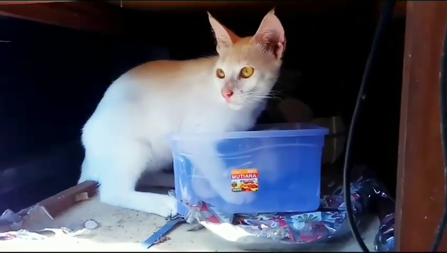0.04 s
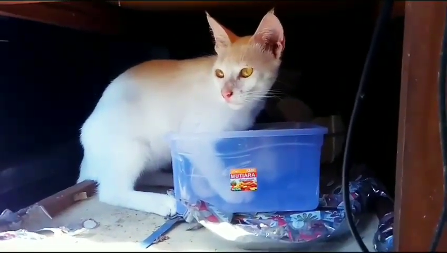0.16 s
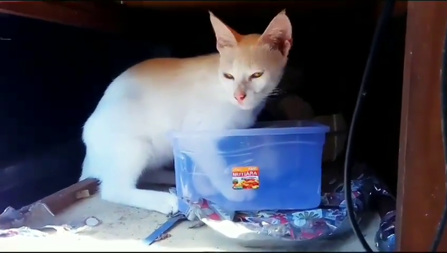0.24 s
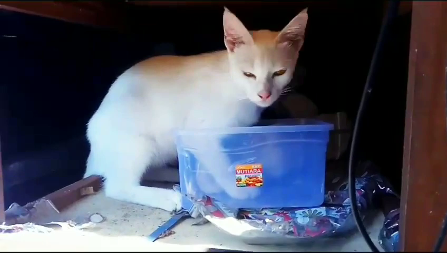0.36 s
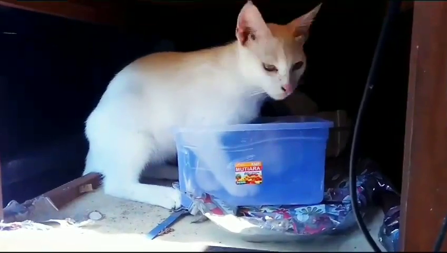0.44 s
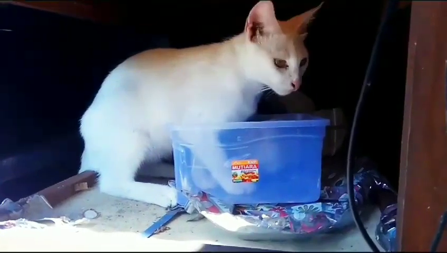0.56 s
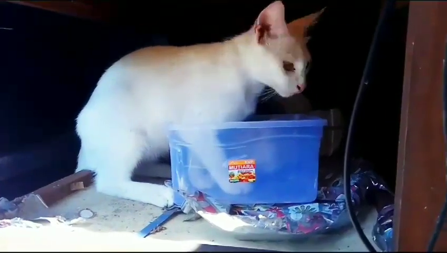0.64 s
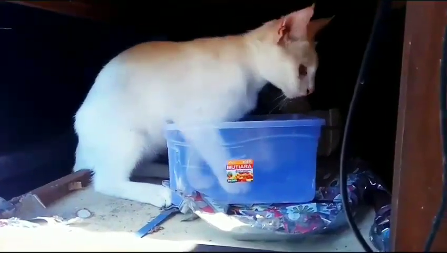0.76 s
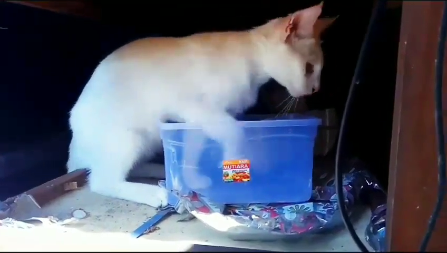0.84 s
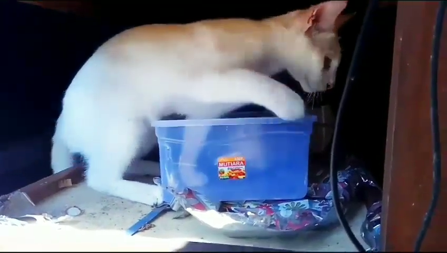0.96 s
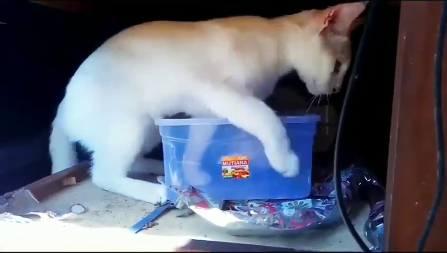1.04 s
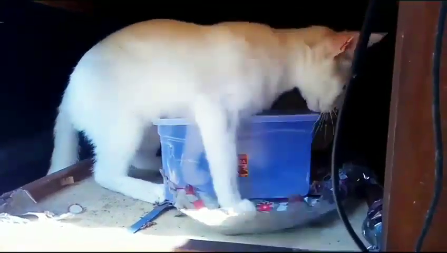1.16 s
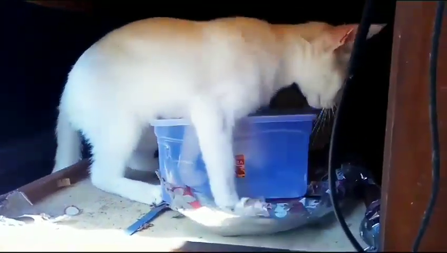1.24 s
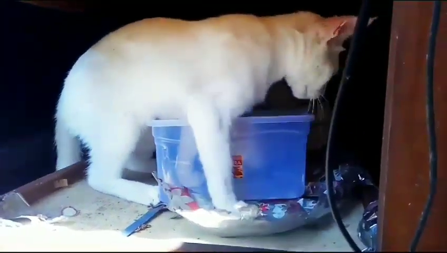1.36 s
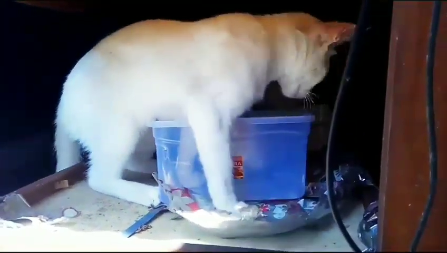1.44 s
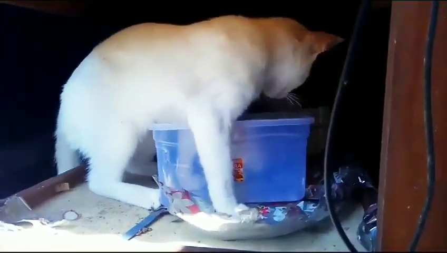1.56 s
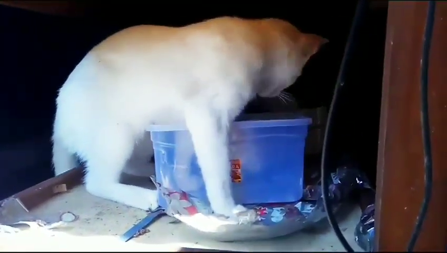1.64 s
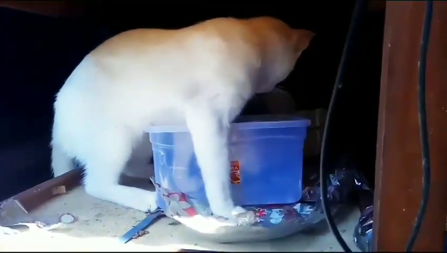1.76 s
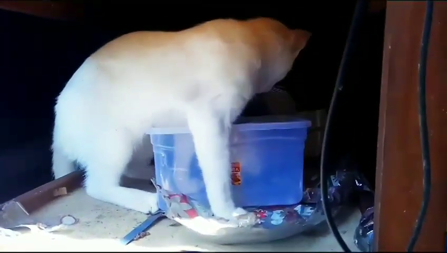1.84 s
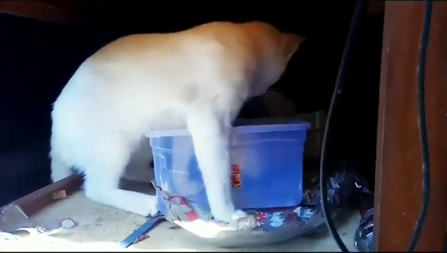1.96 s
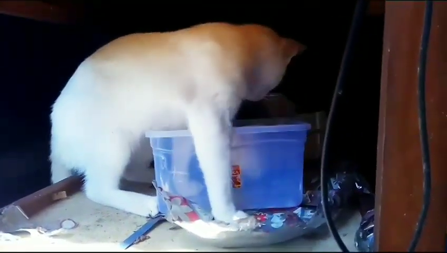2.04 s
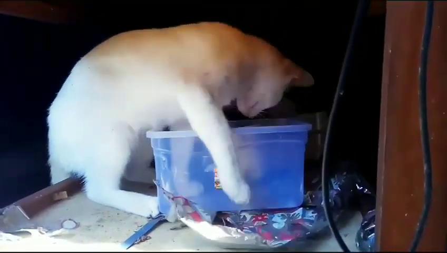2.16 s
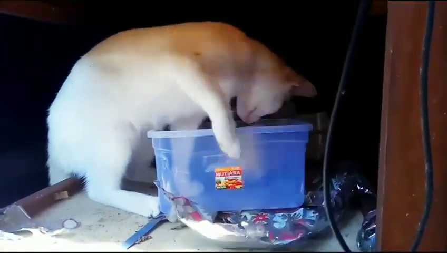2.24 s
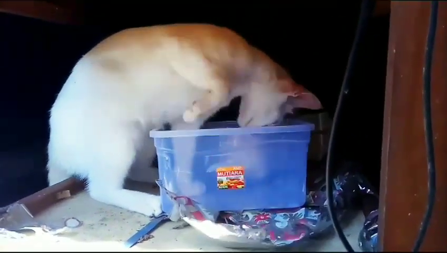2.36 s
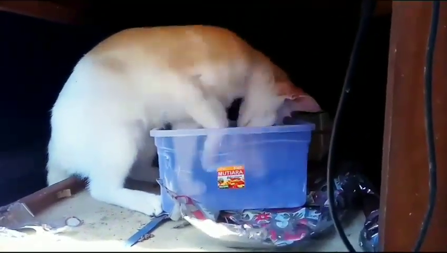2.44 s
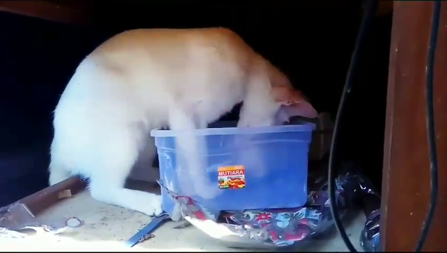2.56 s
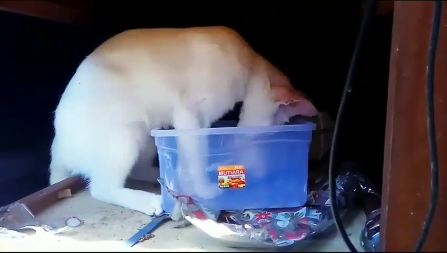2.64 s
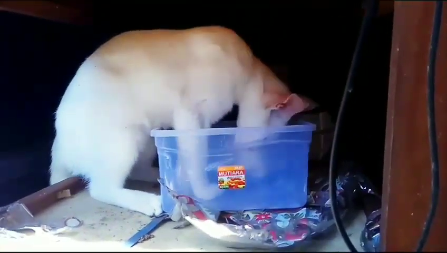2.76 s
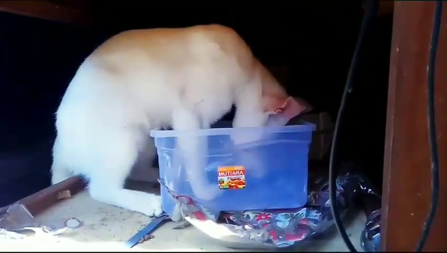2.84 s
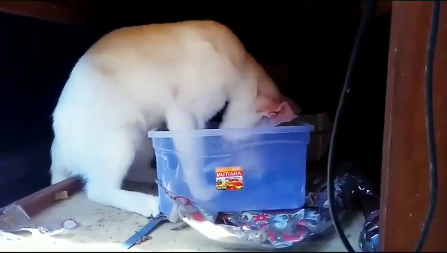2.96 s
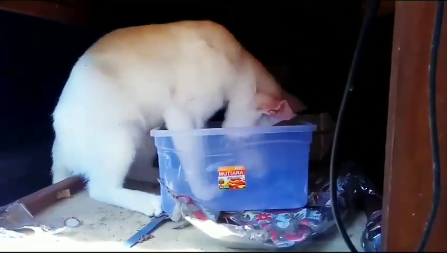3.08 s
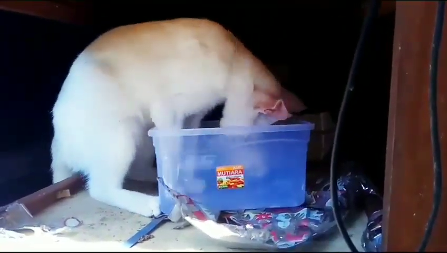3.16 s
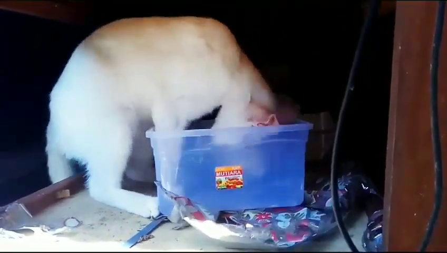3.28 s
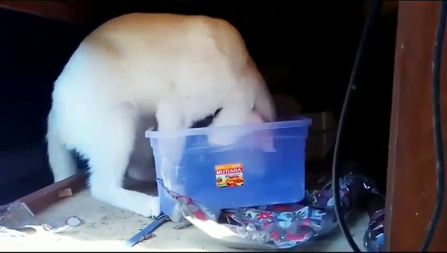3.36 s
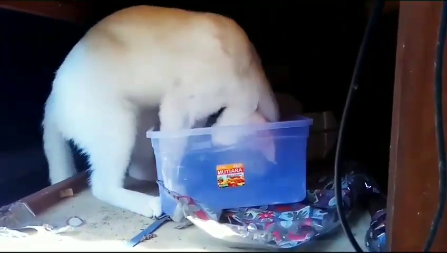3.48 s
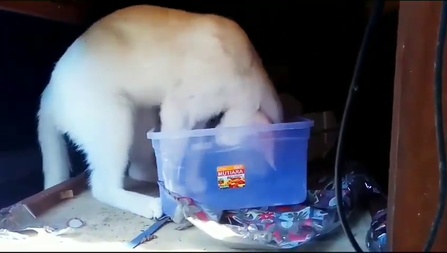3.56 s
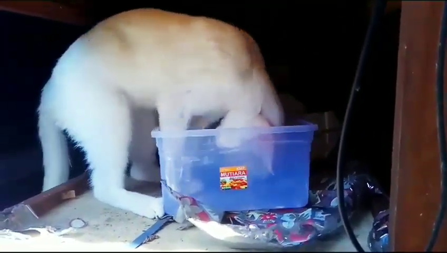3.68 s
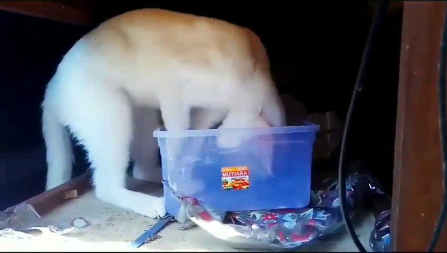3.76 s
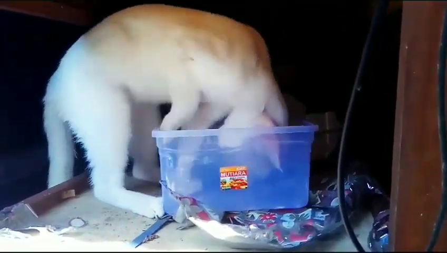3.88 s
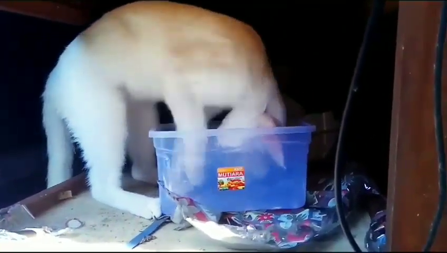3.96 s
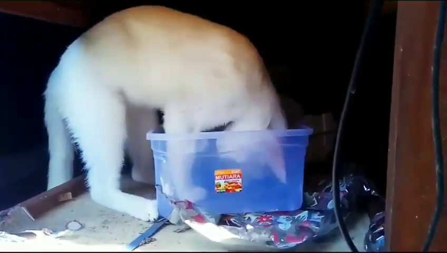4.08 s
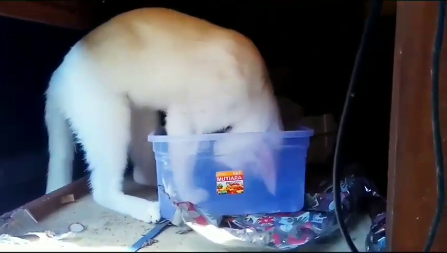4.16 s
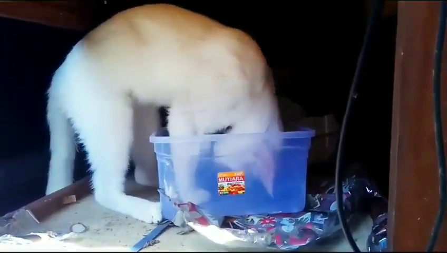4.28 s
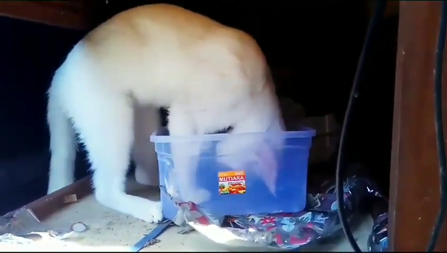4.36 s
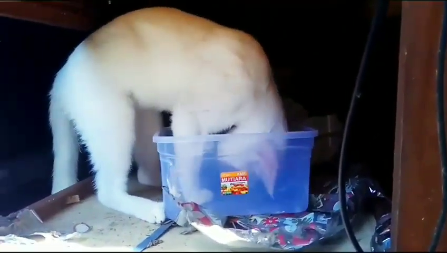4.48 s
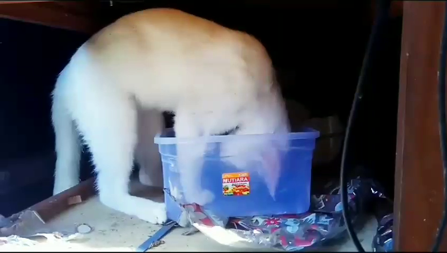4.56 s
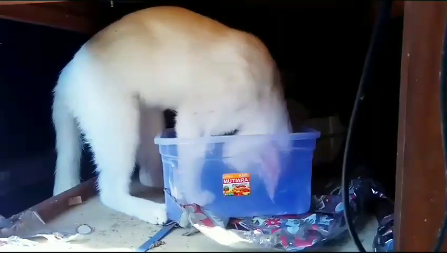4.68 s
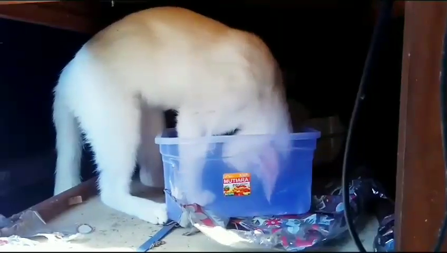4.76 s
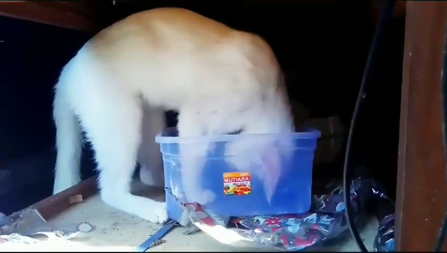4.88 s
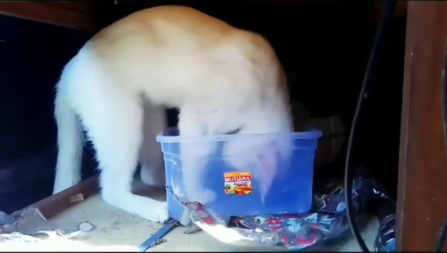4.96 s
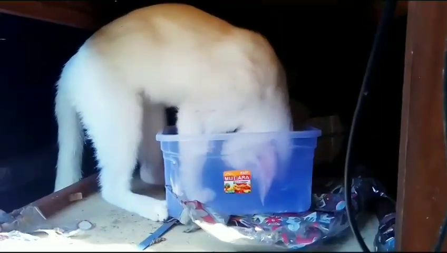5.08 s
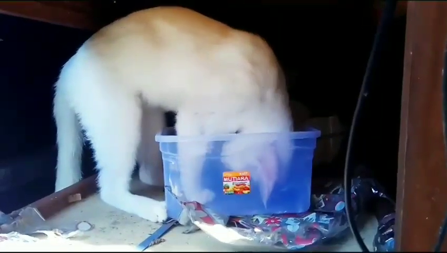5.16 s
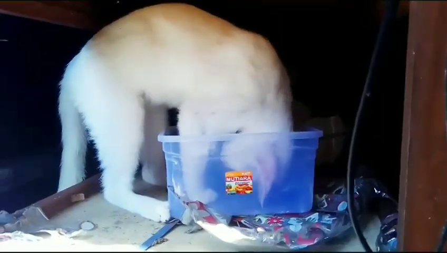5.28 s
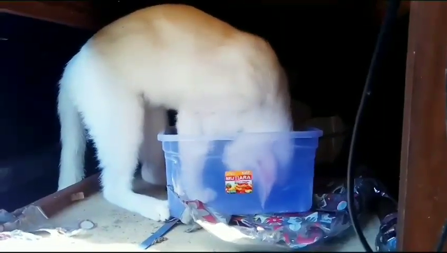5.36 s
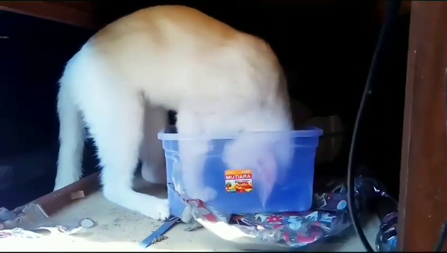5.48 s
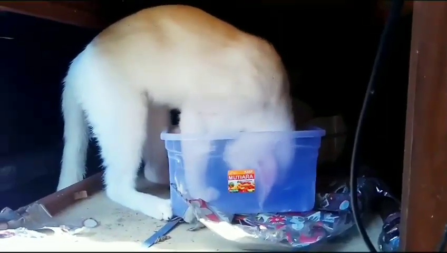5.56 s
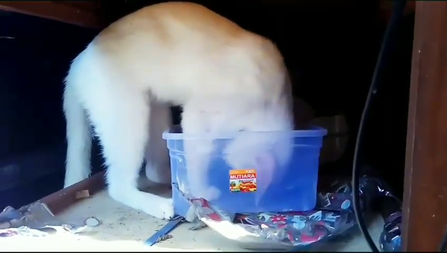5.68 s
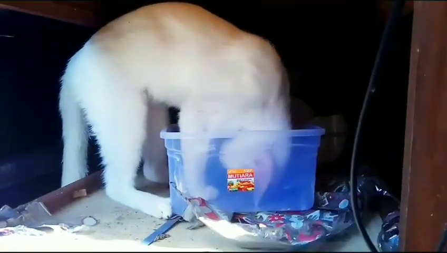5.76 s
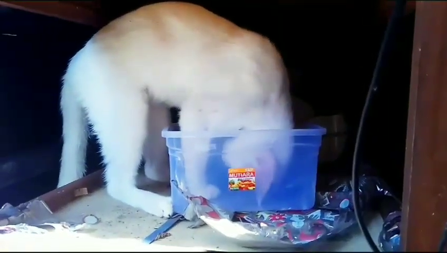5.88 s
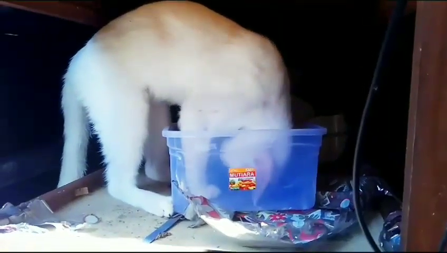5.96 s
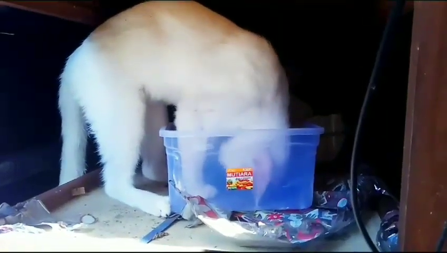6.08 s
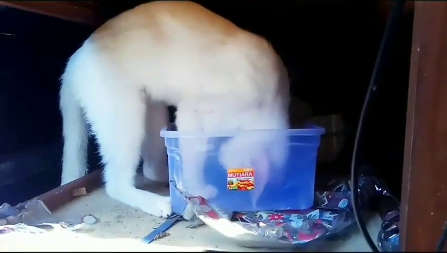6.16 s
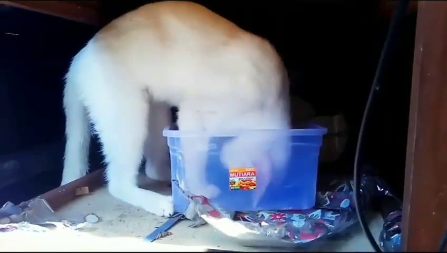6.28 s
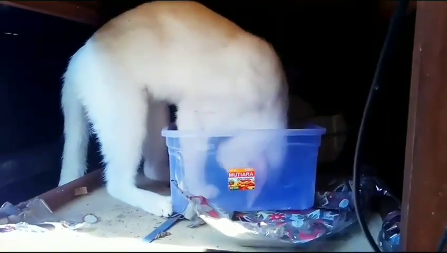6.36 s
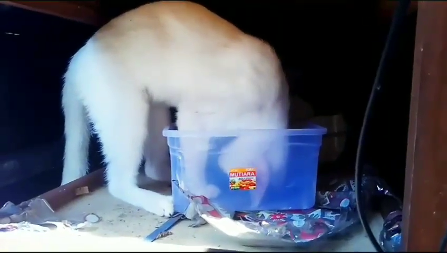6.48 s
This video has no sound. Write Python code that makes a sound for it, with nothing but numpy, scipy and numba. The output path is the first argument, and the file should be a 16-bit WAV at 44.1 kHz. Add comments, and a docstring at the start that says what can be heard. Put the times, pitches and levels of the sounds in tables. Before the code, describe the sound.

In a small, dry nook, a cat steps into a thin plastic tub with a brief scuff and soft knocks. A bag beneath it crackles, paws bump the walls and fur brushes the rim. Then the cat licks the bottom, and the plastic snaps back in loud, hollow clicks, about three a second, with faint tongue rasps between. The sound is close, over a faint low rumble and a thin high hiss on the right.

```python
"""In a small, dry nook a cat climbs into a thin plastic tub on a crinkly bag and licks the bottom clean.
Fur brushes the rim, paws scuff and thump, and creases in the bag give way with a crackle.
Each stroke of the rough tongue rasps, and the flexed plastic snaps back and rings.
Under it lie a low rumble, faint outdoor noise and a thin, steady high hiss on the right."""
import sys
import numpy as np
from scipy import signal
from scipy.fft import rfft, irfft
from scipy.io import wavfile
from numba import njit

SR = 44100
rng = np.random.default_rng(int(sys.argv[2]) if len(sys.argv) > 2 else 0)


def to_wav(s):
    """Save 16-bit WAV."""
    ch = np.atleast_2d(s).T  # columns
    pcm = np.round(np.clip(ch, -1, 1) * 32767)  # PCM
    wavfile.write(sys.argv[1], SR, pcm.astype(np.int16))


N = 287973
TIME = np.arange(N) / SR

# paw and tub scuffs: t/s, level/dB, swell/s, t60/s, brightness/(dB/octave), floor boom/dB
SCUFFS = [(1.109, -39, 0.0024, 0.25, 0, -40), (1.172, -20.5, 0.012, 0.19, 4.5, -47),
          (1.201, -27, 0.0063, 0.056, -10, -39), (2.871, -33, 0.00092, 0.036, -12, -40),
          (3.237, -17.5, 0.00069, 0.054, -7.5, -23.5), (3.24, -22, 0.0073, 0.15, 0, -34),
          (3.296, -37, .0018, 0.16, 5, -34), (3.342, -28.5, 0.0017, 0.083, -1, -40),
          (3.611, -22, 0.00049, 0.059, -5.5, -40), (3.713, -27, 0.0063, 0.13, -3, -44),
          (3.894, -30, 0.0012, 0.063, -0.5, -51), (3.92, -35, 0.0016, 0.037, -2, -40),
          (4.07, -27, 0.024, 0.025, -2, -33.5), (4.094, -15, 0.0013, 0.029, -3, -42),
          (4.146, -28.5, 0.0038, 0.027, 2.5, -35.5)]
# the tub snapping back: t/s, level/dB, panel ring/dB, brightness/(dB/octave)
SNAPS = [(3.6107, -3, -8.5, 5), (4.388, -1.5, -4, 0.5), (4.6965, 1.5, -5.5, 1), (5.020, -0.5, 0, 2.5),
         (5.3783, 1, -0.5, 1.5), (5.7576, 1, -5, 0.5), (6.1208, 2, -3, 0.5), (6.5085, 1.5, -6.5, 1)]
# tongue strokes: lift-off t/s, length/s, level/dB, lift-off tick/dB
LICKS = [(4.614, .13, -49.5, -48), (4.923, 0.059, -45.5, -32), (5.267, 0.077, -47.5, -29.5),
         (5.629, 0.11, -47.5, -16), (5.993, 0.1, -47.5, -16.5), (6.377, 0.088, -45.5, -20.5)]
# tone of creases, claws and barbs clicking: f/Hz, level/dB
TICK_COLOUR = [(60, -48), (300, -7), (900, -4), (2000, 3), (5000, -6.5), (10000, -8.5), (15000, -15.5)]
# tone of the snapping plastic: f/Hz, level/dB
SNAP_COLOUR = [(50, -39), (150, -14), (270, -26), (400, -8.5), (900, 6.5), (1700, 3.5), (3000, -5.5),
               (4200, -10.5), (6500, -17.5), (10000, -21.5), (15000, -39.5)]


def undb(db):
    """Decibels to gain."""
    return 10 ** (np.asarray(db) / 20)


def level(x, db):
    """Scale to an rms level."""
    return x * undb(db) / np.sqrt(np.mean(x ** 2))


def fade(t, t60):
    """Exponential decay, 60 dB down after t60 seconds."""
    return np.exp(-np.log(1000) * t / max(t60, 1e-3))


def stroke(start, length, rise, fall):
    """Envelope that swells up to `start`, holds, and fades; rise and fall are seconds per 60 dB."""
    return fade(np.maximum(start - TIME, 0), rise) * fade(np.maximum(TIME - start - length, 0), fall)


def waver(rate):
    """Random drift with about unit spread and `rate` new values a second."""
    knots = np.arange(0, 8, 1 / rate)
    return np.interp(TIME, knots, 1.2 * rng.standard_normal(len(knots)))


def add(out, start, x):
    """Mix x in at `start` seconds."""
    i = int(start * SR)
    out[..., i:i + x.shape[-1]] += x[..., :N - i]


def response(colour, tilt_db=0, size=2048):
    """Unit-energy impulse response of an EQ curve, tilted by tilt_db per octave above 600 Hz."""
    octave = np.log2(np.maximum(np.fft.rfftfreq(size, 1 / SR), 1))
    hz, db = np.transpose(colour)
    tilt = tilt_db * np.maximum(octave - np.log2(600), 0)
    gain = undb(np.interp(octave, np.log2(hz), db) + tilt)
    cepstrum = irfft(np.log(gain))
    cepstrum[1:size // 2] *= 2  # fold to minimum phase
    cepstrum[size // 2 + 1:] = 0
    impulse = irfft(np.exp(rfft(cepstrum)))
    return impulse / np.linalg.norm(impulse)


def convolve(x, impulse):
    """Filter along time, keeping the length."""
    return signal.oaconvolve(np.atleast_2d(x), np.atleast_2d(impulse), axes=-1)[:, :x.shape[-1]]


@njit
def resonate(x, hz, width_hz):
    """Band-pass whose centre may move every sample."""
    y, band, low = np.empty(len(x)), 0., 0.
    for i in range(len(x)):
        g, damping = np.tan(np.pi * hz[i] / SR), width_hz / hz[i]
        v = (band + g * (x[i] - low)) / (1 + g * (g + damping))
        band, low = 2 * v - band, low + 2 * g * v
        y[i] = damping * v
    return y


def diffuse(n, split_hz):
    """Noise from all sides: centred in the bass, wide in the treble."""
    mid, side = rng.standard_normal((2, n))
    likeness = 1 / (1 + (np.fft.rfftfreq(n, 1 / SR) / split_hz) ** 2)
    mid = rfft(mid) * np.sqrt((1 + likeness) / 2)
    side = rfft(side) * np.sqrt((1 - likeness) / 2)
    return irfft(mid + np.array([side, -side]), n)


def outdoors():
    """A faint, wavering murmur from outside."""
    colour = [(100, -2), (200, -2.5), (260, -8), (340, -6.5), (420, 3), (510, -9.5), (620, -6),
              (800, -14.5), (2000, -30), (5000, -34)]  # tone of the murmur: f/Hz, level/dB
    murmur = convolve(diffuse(N, 490), response(colour))
    return level(murmur, -68) * undb(4 * waver(4))


def rumble():
    """A low bed of noise that swells and sinks."""
    colour = [(15, -34), (25, -11), (42, -36), (66, 4), (85, -9), (140, -9), (230, -16), (500, -54.5)]  # tone of the rumble: f/Hz, level/dB
    swell = [(0.0, -72.5), (0.45, -72.5), (0.76, -68), (2.82, -72.5), (3.35, -64), (4.49, -72.5),
             (4.76, -60.5), (5.14, -70), (5.52, -61), (5.99, -65), (6.26, -55.5), (6.5, -64)]  # its fader ride: t/s, level/dB
    low = convolve(diffuse(N, 380), response(colour, size=16384))
    return level(low, 3) * undb(np.interp(TIME, *np.transpose(swell)))


def air():
    """Soft, even room tone."""
    colour = [(5500, 2.5), (9000, -5), (13500, -11.5), (15200, -36)]  # f/Hz, level/dB
    return level(convolve(diffuse(N, 410), response(colour)), -73)


def hiss():
    """A narrow, steady high hiss, hard right."""
    colour = [(3000, -38), (4300, -18), (5200, -6.5), (5900, -2), (6450, 9), (7000, -4.5), (7500, -14.5),
              (8100, -32), (14000, -48), (15200, -7.5)]  # tone of the hiss: f/Hz, level/dB
    band = convolve(rng.standard_normal(N), response(colour))
    return level(band, -54) * np.array([[0], [1]])


def friction(n, slips_per_s, spread_db):
    """Many tiny slips of very unequal size, each a noise burst of about a millisecond."""
    slipping = rng.random(n) < slips_per_s / SR
    strength = undb(spread_db * np.minimum(rng.exponential(size=n), 4))
    power = signal.lfilter([1], [1, -np.exp(-1 / (0.001 * SR))], slipping * strength ** 2)
    return level(np.sqrt(power + 1e-9) * diffuse(n, 1800), 0)


def walls(x, echo=0.14, skew_s=.00007):
    """Five echoes off the tub walls colour the sound, differently for every spot touched."""
    impulse = np.zeros((2, 1024))
    impulse[:, 0] = 1
    for late, skew, polarity in rng.uniform(-0.82, 1, (5, 3)):
        lag_s = .0035 + .0027 * late + np.array([skew, -skew]) * skew_s
        impulse[[0, 1], (SR * lag_s).astype(int)] += np.copysign(echo, polarity)
    return convolve(x, impulse / np.linalg.norm(impulse[0]))


def rasp(force, gap_hz, width_hz, hollow_db, upper_db, tilt_db):
    """Barbs and whiskers catch and slip on the plastic; the air gap around the head rings hollow."""
    colour = [(50, -47), (150, -10), (260, -3), (400, 3.5), (750, 1.5), (1100, -1.5), (1700, 0),
              (3000, 1.5), (6000, -2.5), (10000, -4.5), (15000, -7.5)]  # tone of the rasp: f/Hz, level/dB
    uneven_force = force * undb(3 * waver(45))
    slips = uneven_force * convolve(friction(N, 2800, 3.2), response(colour, tilt_db))
    # the contact wanders between three spots, each with its own echoes
    shares = np.array([undb(9 * waver(14)) for _ in range(3)])
    scrape = sum(share * walls(slips, echo=.5) for share in shares / shares.sum(0))
    # the gap opens and closes with every small move of the head
    hz = gap_hz * np.exp(.08 * waver(16))
    closure = undb(3 * waver(14))
    hollow = np.array([resonate(side, hz, width_hz) for side in scrape])
    upper = np.array([resonate(side, 2.18 * hz, 2 * width_hz) for side in scrape])
    return scrape + closure * (undb(hollow_db) * hollow + undb(upper_db) * upper)


def grit(force, gain_db, tilt_db):
    """Single barbs and hairs catch harder and let go with a tiny bright click."""
    return undb(gain_db) * convolve(force * friction(N, 70, 3), response(TICK_COLOUR, tilt_db))


def rubs():
    """Fur and muzzle brush the plastic as the head works its way into the tub."""
    touches = [(0.856, 0.094, -67.5), (2.721, 0.11, -62.5), (2.839, 0.013, -50.5), (2.916, 0.064, -56),
               (3.142, 0.051, -50), (3.217, 0.041, -39.5), (3.372, 0.053, -46.5), (3.482, 0.0085, -50.5),
               (3.707, 0.24, -44), (4.051, 0.08, -40), (4.225, 0.031, -49)]  # brushes of the head: t/s, length/s, level/dB
    force = sum(undb(db) * stroke(start, length, rise=.087, fall=.26) for start, length, db in touches)
    brush = rasp(force, gap_hz=724, width_hz=185, hollow_db=6, upper_db=5.5, tilt_db=0.5)
    return undb(2) * brush + grit(force, gain_db=-10.5, tilt_db=4)


def thumps(floor_lag_s=0.0024, lift_boom_db=-25.5, size=16384):
    """Uneven pushes knock on the tub walls; the floor booms just after each scuff and tongue lift."""
    knocks = [(1.01, -55, 280, 0.042), (1.113, -33.5, 1560, 0.054), (1.206, -30.5, 480, 0.07),
              (2.819, -44, 1940, 0.11), (2.877, -39.5, 333, 0.11), (3.094, -30, 1510, 0.038),
              (3.198, -31.5, 1670, 0.064), (3.238, -22.5, 660, 0.098), (3.288, -20.5, 695, 0.052),
              (3.501, -42, 380, .11), (3.72, -37, 313, 0.15), (4.875, -36.5, 726, .22),
              (5.218, -39, 710, .086), (6.22, -34.5, 426, 0.17), (6.243, -33.5, 385, 0.3)]  # pushes on one wall: t/s, level/dB, f/Hz, t60/s
    floor_modes = [(158, -1.5, 0.26), (231, -9, 0.17), (357, -8.5, 0.13)]  # modes of the tub floor: f/Hz, level/dB, t60/s
    out, t = np.zeros(N), TIME[:size]
    loads = [(start, db) for start, *_, db in SCUFFS]
    loads += [(lift, db + lift_boom_db) for lift, *_, db in LICKS]
    booms = [(start + floor_lag_s, db + mode_db, hz, t60)
             for start, db in loads for hz, mode_db, t60 in floor_modes]
    for start, db, hz, t60 in knocks + booms:
        band = signal.butter(2, hz * np.exp([-.18, .18]), "band", fs=SR, output="sos")
        force = (1 - np.exp(-t / (0.0084 * t60))) * fade(t, t60)  # longer thumps have softer attacks
        boom = force * signal.sosfilt(band, rng.standard_normal(2 * size))[size:]
        add(out, start, undb(db) * boom * np.linalg.norm(force) / np.linalg.norm(boom))
    return out


def scuffs(size=8192):
    """Paws and tub skid in short bursts of friction that swell and die away."""
    colour = [(40, -48), (100, -12.5), (300, -8.5), (700, 2), (1600, 3.5), (3000, 2), (6000, -4),
              (10000, -3), (15000, -12)]  # tone of a scuff: f/Hz, level/dB
    out, t = np.zeros((2, N)), TIME[:size]
    for start, db, swell, t60, tilt_db, _ in SCUFFS:
        force = np.minimum(t / swell, 1) * fade(np.maximum(t - swell, 0), t60)
        skid = walls(force * friction(size, 3300, 0.91))
        add(out, start, undb(db) * convolve(skid, response(colour, tilt_db)))
    return out


def bag():
    """Little creases give way in the bag; now and then a stiffer one pops."""
    rustles = [(1.12, 0.067, -42.5, 0.24), (1.294, 0.022, -49.5, 1), (2.167, 0.043, -39, .15),
               (2.294, 0.026, -53.5, 0.73), (2.528, 0.037, -55, 0.86)]  # the bag settling under the weight: t/s, length/s, level/dB, t60/s
    force = sum(undb(db) * stroke(start, length, rise=.11, fall=t60)
                for start, length, db, t60 in rustles)
    crinkle = convolve(force * friction(N, 1200, 3.5), response(TICK_COLOUR, tilt_db=3))
    pops = convolve(force * friction(N, 90, 3), response(TICK_COLOUR, tilt_db=7))
    return undb(-2) * crinkle + undb(-5) * pops


def ticks(trim_db=-13, lift_tilt_db=-0.5, size=2048):
    """Single creases, claw tips and the tongue lifting off each give a short, dry crack."""
    clicks = [(1.312, -25, 15), (1.348, -29, -1.5), (1.41, -33, 1), (1.538, -34, 7.5), (2.134, -23.5, 2.5),
              (2.149, -18, 11), (2.157, -17, 11), (2.175, -8.5, 15), (2.202, -17.5, 5), (2.272, -15.5, 8.5),
              (2.383, -25, 6), (2.404, -23, 8), (2.49, -9.5, 8), (2.637, -24, 10), (2.734, -24, 2.5),
              (3.103, -9, 10.5), (3.481, -24, 0.5), (4.087, -6.5, -1.5), (4.812, -26, -3), (5.2, -17, 6)]  # creases and claws: t/s, level/dB, brightness/(dB/octave)
    lifts = [(lift, db, lift_tilt_db) for lift, *_, db in LICKS]
    out = np.zeros((2, N))
    for start, db, tilt_db in clicks + lifts:
        crack = diffuse(size, 1900) * fade(TIME[:size], t60=0.028)
        add(out, start, undb(db + trim_db) * convolve(crack, response(TICK_COLOUR, tilt_db)))
    return out


def panel_ring(t, cycles=34, skew_s=.00005):
    """The tub's panels ring; the muzzle presses a new spot each time, detuning and reweighting them."""
    modes = [(360, -19), (527, -16), (689, -6.5), (850, -0.5), (905, -6), (1160, -36), (1291, -45),
             (1453, -2.5), (1754, -4), (2002, -10), (2260, -1), (2842, 1.5), (3111, 2.5), (3692, 1),
             (4155, -44)]  # panel modes: f/Hz, level/dB
    ring = 0
    for k, (mode_hz, db) in enumerate(modes):
        detune, weight_db, lag = rng.standard_normal(3)
        hz = mode_hz * (1 + .01 * detune)
        phase = 2 * np.pi * hz * (t + np.array([[1], [-1]]) * lag * skew_s)
        ring += (-1) ** k * undb(db + weight_db) * fade(t, t60=cycles / hz) * np.sin(phase)
    return ring


def snaps(crack_db=5, ring_db=-16, chatter_s=0.0071, size=8192):
    """The plastic flips back with one sharp push, chatters until it seats, and rings."""
    out, t = np.zeros((2, N)), TIME[:size]
    push = response([(2000, -1.5), (5000, -0.5)], size=32)
    for start, db, panel_db, tilt_db in SNAPS:
        chatter = diffuse(size, 1200) * np.exp(-(t / chatter_s) ** 2) * (t > .0007)
        contact = chatter / np.linalg.norm(chatter[0])
        contact[:, :len(push)] += push
        crack = undb(crack_db) * convolve(contact, response(SNAP_COLOUR, tilt_db))
        ring = undb(ring_db + panel_db) * panel_ring(t)
        add(out, start, undb(db) * (crack + ring))
    return out


def slides(dull_hz=4500):
    """After every snap the plastic slides against the soft muzzle with a dull scrape."""
    force = sum(undb(db) * (TIME > start) * fade(np.maximum(TIME - start, 0), t60=0.58)
                for start, db, *_ in SNAPS)
    scrape = convolve(force * friction(N, 3100, 2.1), response(SNAP_COLOUR, tilt_db=1))
    return undb(-45) * signal.lfilter(*signal.butter(1, dull_hz, fs=SR), scrape)


def licks():
    """The rough tongue drags over the bottom until it lifts off."""
    force = sum(undb(db) * stroke(lift - length, length, rise=.24, fall=.21)
                for lift, length, db, _ in LICKS)
    drag = rasp(force, gap_hz=800, width_hz=83, hollow_db=4, upper_db=-2, tilt_db=0.3)
    return undb(3) * drag + grit(force, gain_db=-8, tilt_db=5)


def nook(x, wet_db=-13, dull_hz=9000, size=16384):
    """Close boards and walls add a short, dull tail."""
    t = TIME[:size]
    build_up = 1 - np.exp(-(t / .009) ** 2)
    tail = diffuse(size, 900) * build_up * fade(t, t60=.18)
    tail *= undb(wet_db) / np.linalg.norm(tail[0])
    return x + convolve(x, signal.lfilter(*signal.butter(1, dull_hz, fs=SR), tail))


def microphone(x):
    """Two unlike ports colour the sound; the right one hears it a sample later."""
    left = [(700, 4.5), (1500, 8), (2500, 8.5), (4500, 5), (7000, 10.5), (8200, 5.5), (10000, 6.5),
            (13500, 3.5), (15200, 13.5)]  # left port response: f/Hz, level/dB
    right = [(900, 2), (1500, -1), (2400, -1.5), (4500, 4.5), (6600, 12.5), (7400, 1.5), (8400, -11.5),
             (10000, -19), (13800, -41), (15200, 9.5)]  # right port response: f/Hz, level/dB
    return convolve(x, np.array([response(left), np.roll(response(right), 1)]))


def scene():
    """Cat, tub and bag sound through the nook and the microphone, over the ambience bed."""
    foley = nook(snaps() + slides() + scuffs() + ticks() + thumps() + rubs() + licks() + bag())
    low_bed = (outdoors() + rumble()) * undb([[-1.3], [1.3]])  # leans right
    return microphone(foley) + low_bed + air() + hiss()


def record(dry):
    """The phone cuts the top steeply above 15.7 kHz."""
    return signal.sosfilt(signal.ellip(8, .2, 70, 15700, fs=SR, output="sos"), dry)


dry = scene()
out = record(dry)
to_wav(out)
```